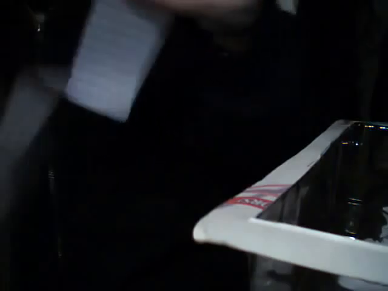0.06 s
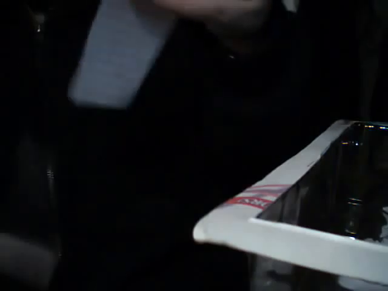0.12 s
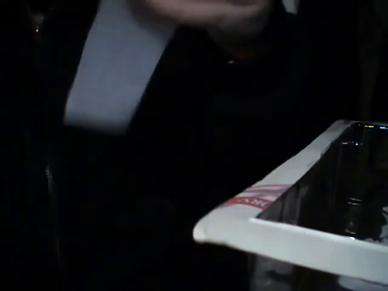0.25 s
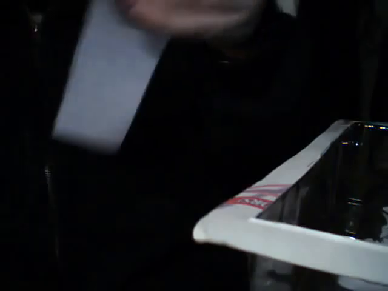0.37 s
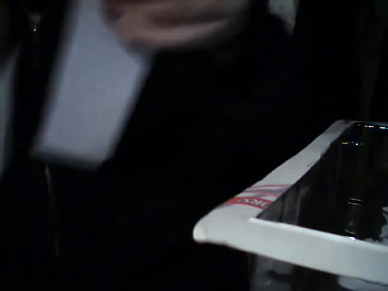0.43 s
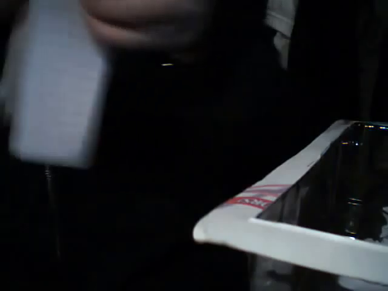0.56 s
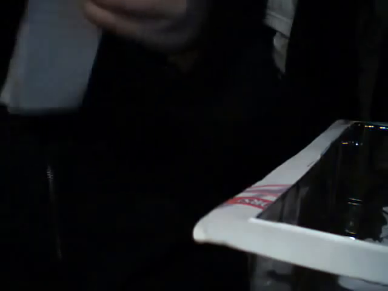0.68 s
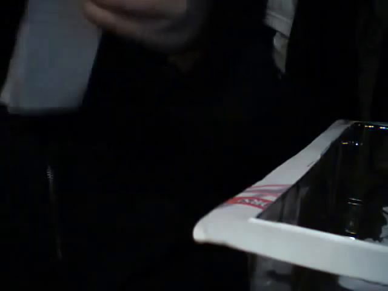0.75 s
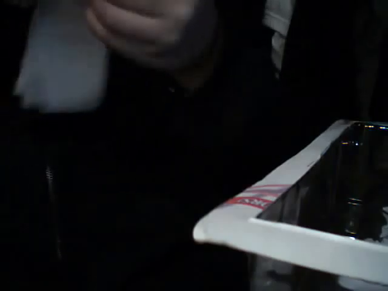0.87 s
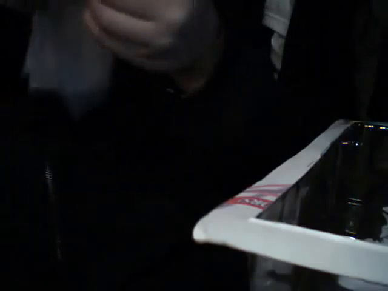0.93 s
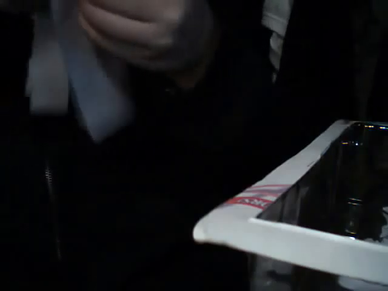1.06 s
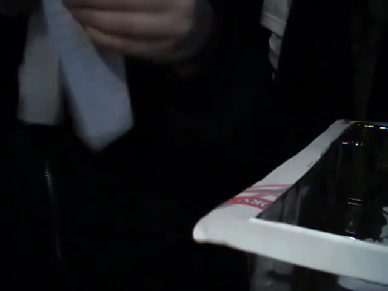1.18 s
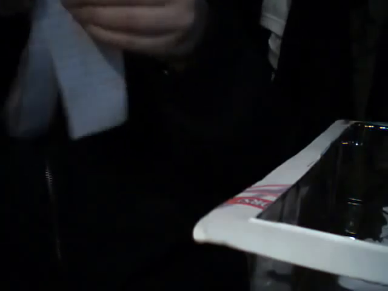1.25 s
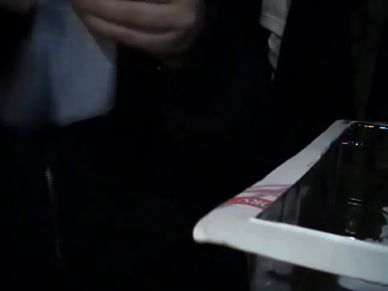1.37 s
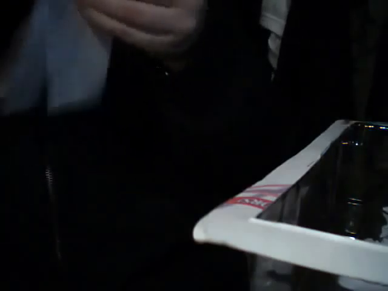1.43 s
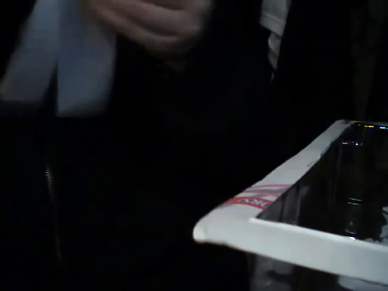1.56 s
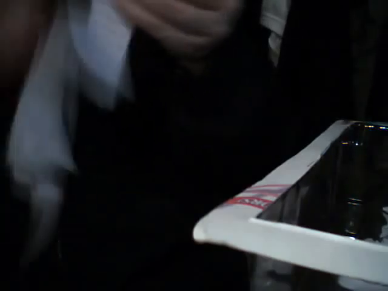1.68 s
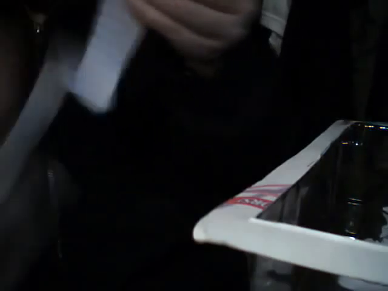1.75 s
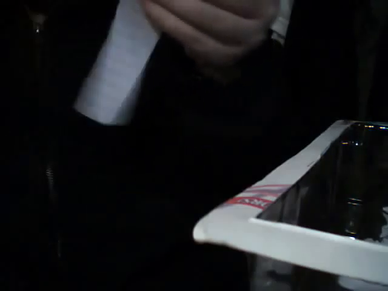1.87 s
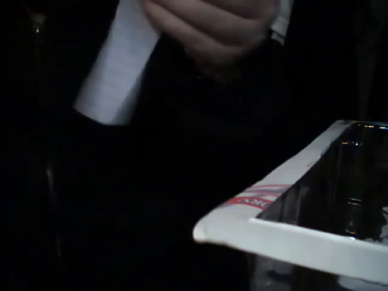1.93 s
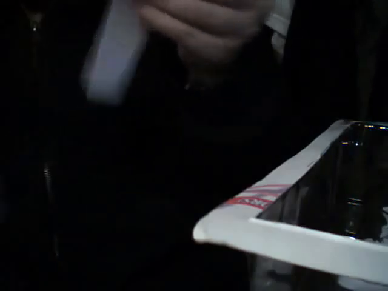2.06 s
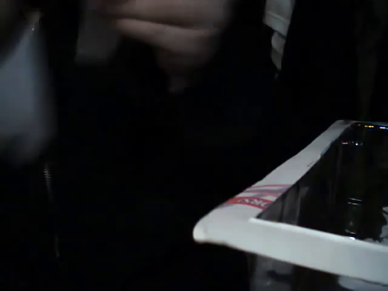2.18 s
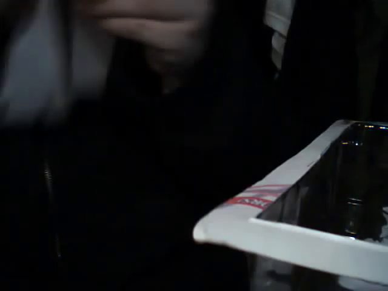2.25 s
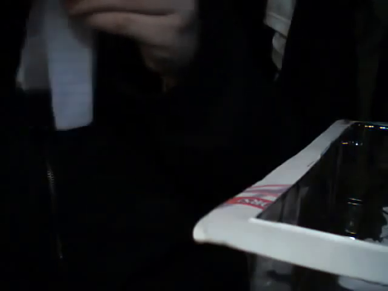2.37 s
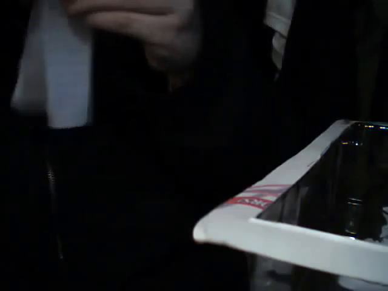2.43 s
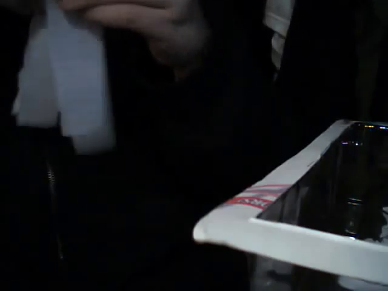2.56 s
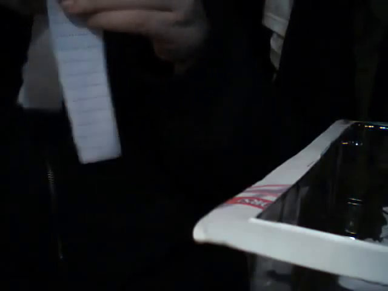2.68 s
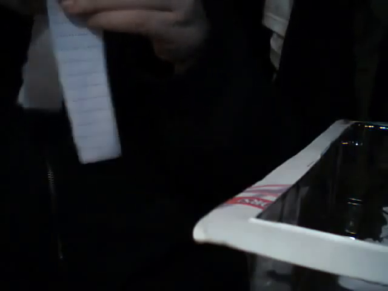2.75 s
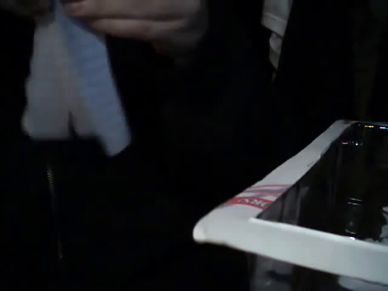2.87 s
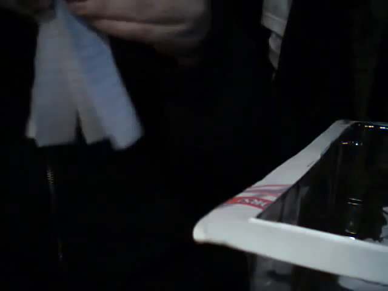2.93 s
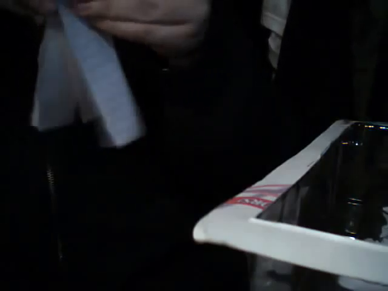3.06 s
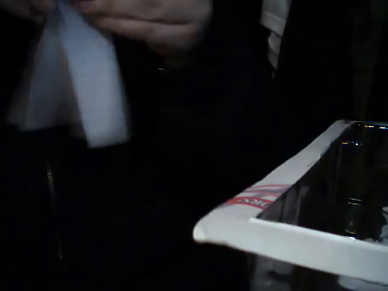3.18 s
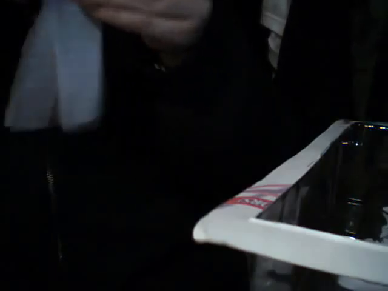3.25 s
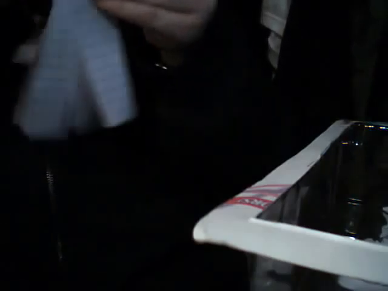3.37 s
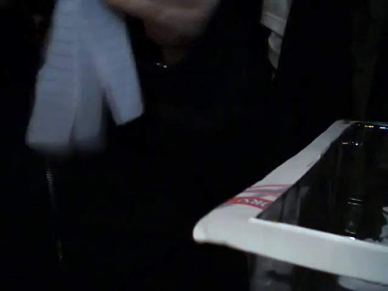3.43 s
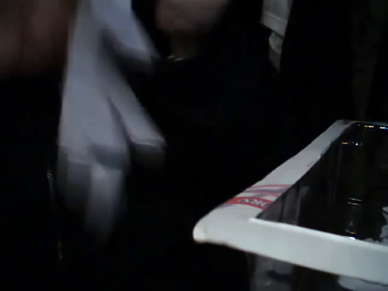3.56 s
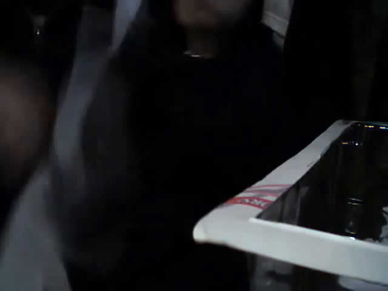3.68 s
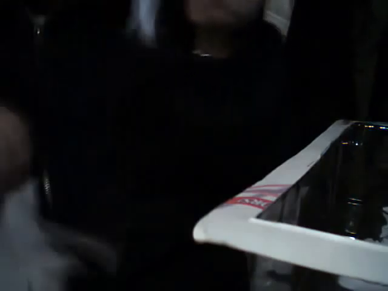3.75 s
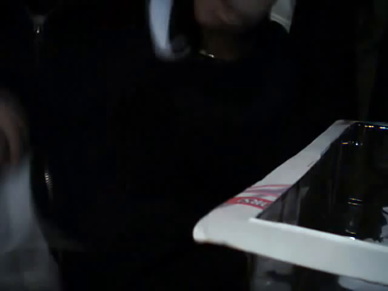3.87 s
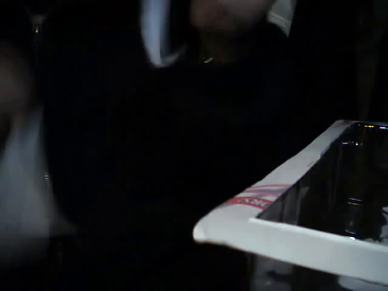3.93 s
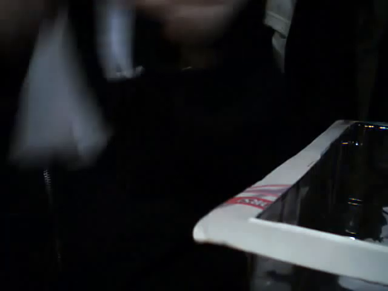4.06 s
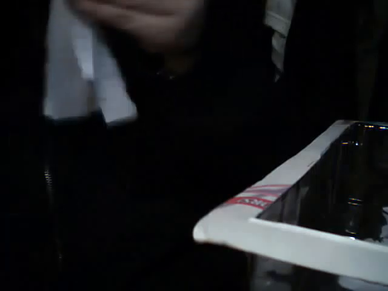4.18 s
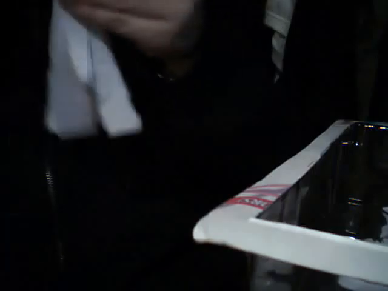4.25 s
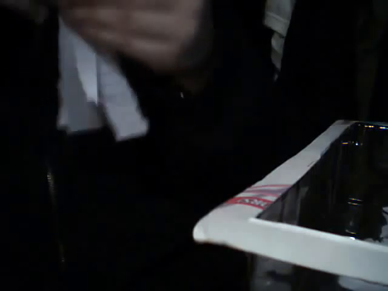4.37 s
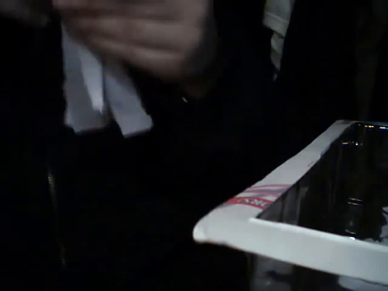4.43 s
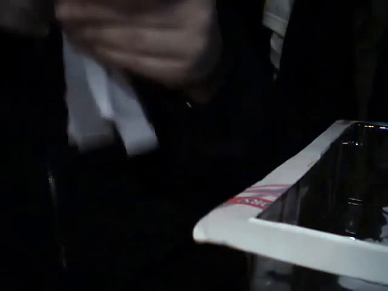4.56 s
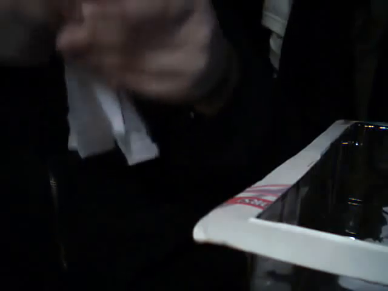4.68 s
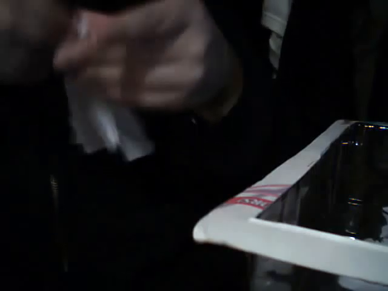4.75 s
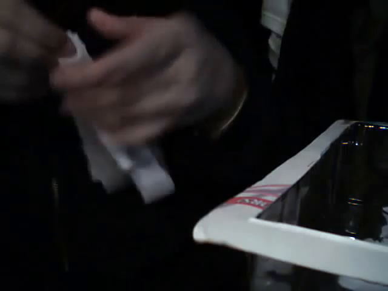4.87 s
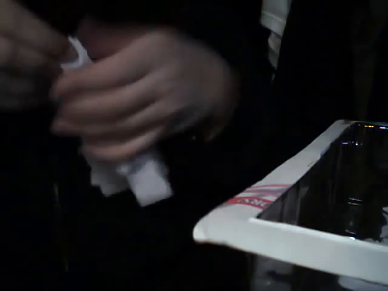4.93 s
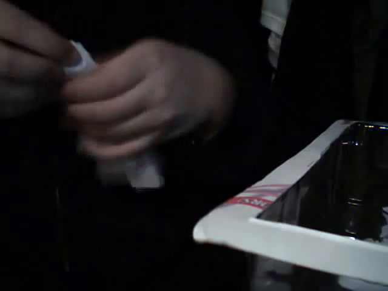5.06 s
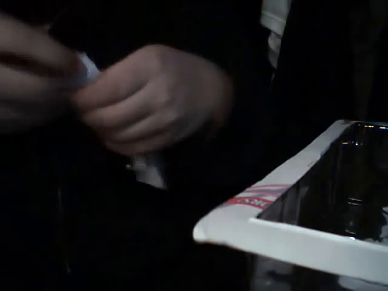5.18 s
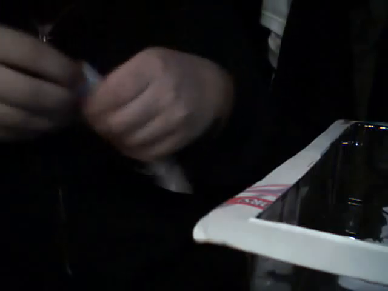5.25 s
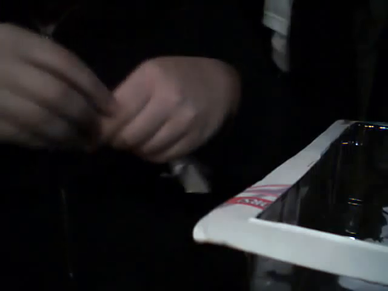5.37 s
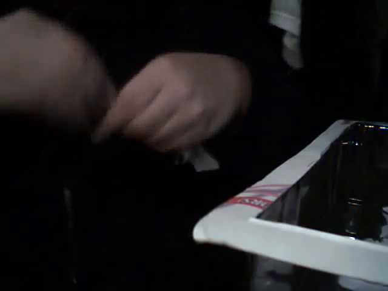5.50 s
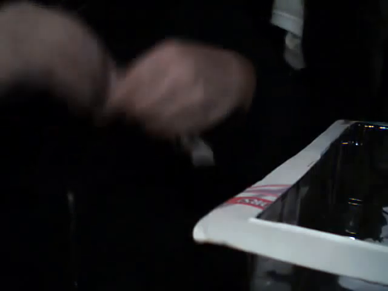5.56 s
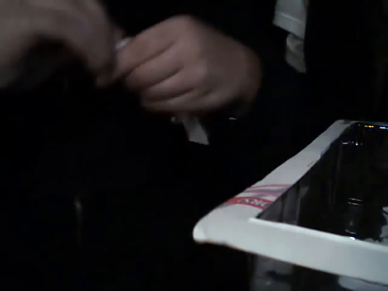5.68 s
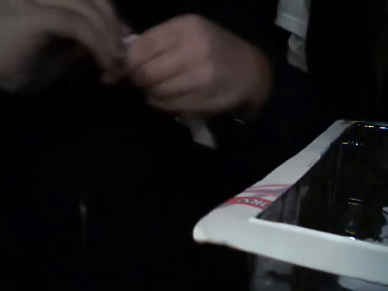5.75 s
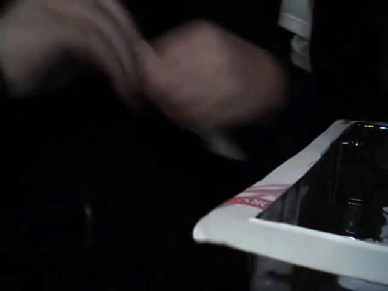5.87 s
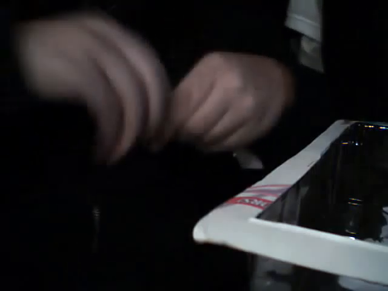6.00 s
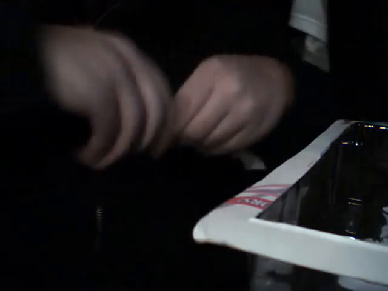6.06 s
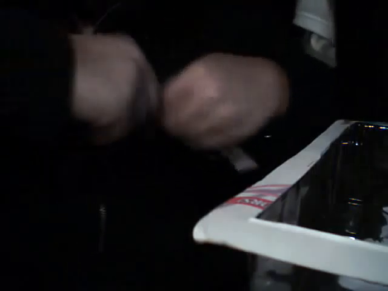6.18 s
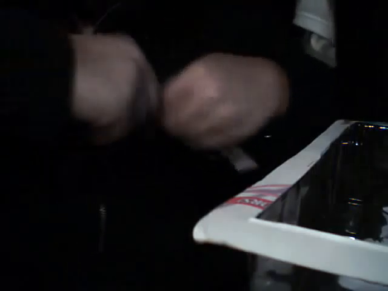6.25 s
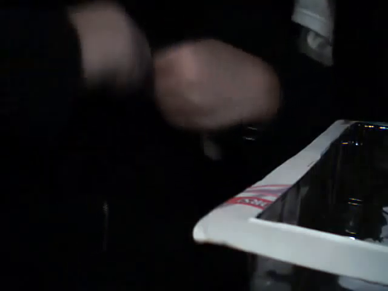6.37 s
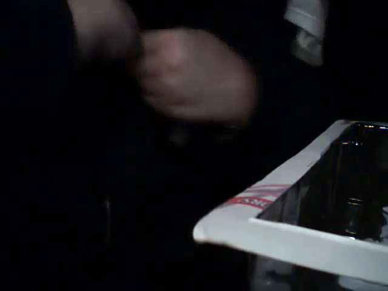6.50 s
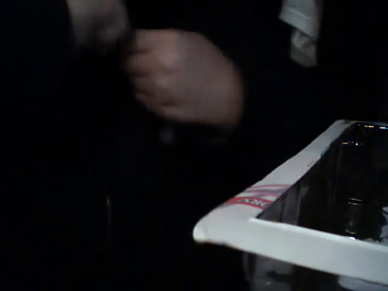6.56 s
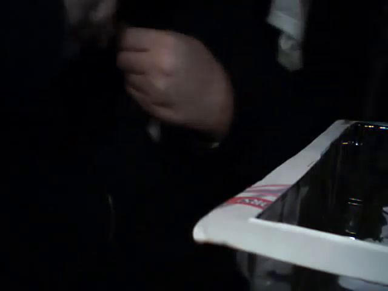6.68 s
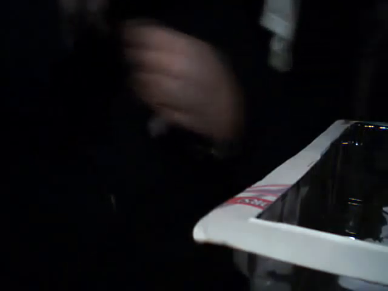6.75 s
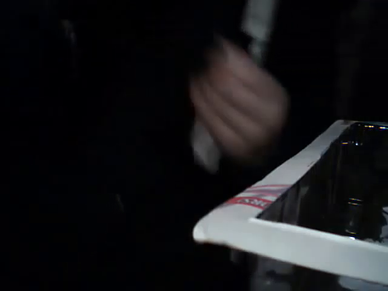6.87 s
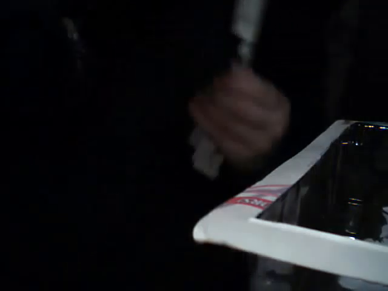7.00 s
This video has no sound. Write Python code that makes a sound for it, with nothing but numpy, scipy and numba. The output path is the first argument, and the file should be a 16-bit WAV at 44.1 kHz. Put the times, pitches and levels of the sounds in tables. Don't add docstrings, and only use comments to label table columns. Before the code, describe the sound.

Three quick close-up rips of paper, the first loudest, with faint finger rustles and creases between and after, over a soft steady fan whir.

```python
import sys
import numpy as np
from scipy import signal
from scipy.fft import rfft, irfft, dct
from scipy.io import wavfile
from scipy.ndimage import uniform_filter1d, minimum_filter1d
from numba import njit

SR = 44100
rng = np.random.default_rng(int(sys.argv[2]) if len(sys.argv) > 2 else 0)


def makeup_ratio(level_db):
    decades = np.asarray(level_db, float) / 20
    return 10 ** decades


def store_wav(level_fs):
    pcm = np.round(np.clip(np.atleast_2d(level_fs), -1, 1) * 32767)
    wavfile.write(sys.argv[1], SR, pcm.T.astype(np.int16))


N = 309582

# frequency in Hz, density in dB per Hz.
FAN_AIR = [(25, -13.5), (195, -13), (272, -9.5), (310, -18.5), (482, -8), (800, -9.5), (930, -19.5),
           (1050, -11.5), (1400, -6), (2000, -9), (2600, -14), (2800, -26), (3300, -43), (9000, -95.5)]
# frequency in Hz, density in dB per Hz.
FAN_HISS = [(1500, -40.5), (2700, -8.5), (3050, -4), (3400, -1), (4000, -4), (4600, -11), (5300, -7),
            (6000, -15.5), (7000, -13), (8000, -32)]
# frequency in Hz, rms level in dB.
FAN_WHINES = [(269.2, -73.5), (339.1, -80.5), (473.7, -71), (1087, -67.5), (1292, -58.5), (1631, -68.5),
              (2579, -74.5), (2719, -90)]
# frequency in Hz, density in dB per Hz.
PAPER_COLOUR = [(30, -14.5), (160, -13), (324, -13.5), (517, -6), (1170, -6), (1440, -5.5), (1960, -4),
                (3150, -10.5), (3600, -2), (4550, -6.5), (5150, -2.5), (5800, -2.5), (6500, -5.5),
                (7900, -13)]

# low edge in Hz, high edge in Hz, grains per second,
# cycles a grain, size scatter in dB, burst depth in dB, bursts per second.
SNAP = (4500, 7910, 6000, 5.2, 3.1, 1.6, 150)
BUZZ = (2600, 4500, 3000, 6.0, 2.6, 0.96, 120)
CRACKLE = (926, 2600, 1500, 6.16, 1.7, 3.0, 100)
FLAP = (300, 1000, 450, 5.5, 2.4, 1.1, 45)
PUSH = (19, 300, 460, 2.8, 0.88, 1.519, 30)
SLIDE = (2100, 8200, 5500, 12, 2, 4.6, 110)
# level in dB re the pull,
# share of the slack (ratio), power of the swing (exponent).
LAYER_ANSWERS = [
    (0.12, 0.017, 0.0088),
    (-1.5, 0.3085, 0.032),
    (-1.5, 1, .01),
    (-7, 0.697, .35),
]

# time in seconds, pull as level of the snapping fibres in dB,
# slack of the sheet in dB.
FIRST_RIP = [
    (0.0, -24, 3.5),
    (0.078, -18, -2.5),
    (0.084, -16, -2.5),
    (0.146, -22.5, -5),
    (0.15, -16.5, -10),
    (0.18, -18, -10.5),
    (0.198, -29, 2),
    (0.244, -38.5, -5),
    (0.268, -54.5, 0.5),
]
SECOND_RIP = [
    (1.6, -60.5, 8),
    (1.674, -25, -6.5),
    (1.736, -25.5, -3),
    (1.75, -23.5, -5.5),
    (1.786, -22.5, 0.5),
    (1.874, -23.5, -6.5),
    (1.906, -28, -8),
    (1.942, -52, -9.5),
    (1.95, -63, -5),
]
NICK = [
    (3.325, -62, 6),
    (3.339, -28.5, -19.5),
    (3.351, -42, -9),
    (3.359, -35, 1.5),
    (3.375, -54, -6),
    (3.406, -60, 3),
]
SLOW_START = [
    (3.49, -74, 0),
    (3.502, -50, -6),
    (3.52, -58, -10),
    (3.544, -39, -2),
    (3.608, -36, -9),
]
THIRD_RIP = [
    (3.608, -31, -12),
    (3.63, -23.5, -9.5),
    (3.668, -23, -17),
    (3.68, -27, -5.5),
    (3.722, -25, -8),
    (3.75, -32, -14),
    (3.76, -26, -12),
    (3.828, -60, -7),
    (3.835, -63, 11),
]
# loudest at in seconds, level in dB,
# rise in seconds, fall in seconds.
AIR = [
    (0.13, -33, 0.16, .12),
    (1.808, -38, .14, 0.11),
    (3.674, -42, 0.14, 0.037),
    (3.726, -42.5, 0.024, 0.036),
]
# time in seconds, peak in dB, pitch in Hz.
POPS = [(0.0473, -8.5, 2000), (0.0757, -8.5, 1990), (0.158, -16, 1390), (0.1955, -15.5, 1160),
        (1.652, -26, 1310), (1.713, -18.5, 1520), (1.755, -16.5, 510), (1.892, -20.5, 1150),
        (3.6203, -21, 1480), (3.6527, -21, 2100), (3.6772, -21, 2010), (3.7026, -18, 1980),
        (3.7625, -30, 1730), (3.7969, -37, 1700)]

# loudest at in seconds, level in dB, rise in seconds, fall in seconds.
RUSTLE = [(0.29, -63.5, 0.026, 0.082), (0.435, -71.5, .03, 0.22), (1.0, -72, .4, 0.19),
          (1.31, -66.5, 0.41, 0.087), (1.46, -72.5, .03, 0.22), (1.56, -58.5, 0.11, 0.17),
          (1.99, -64.5, 0.049, 0.14), (2.105, -66.5, 0.028, 0.24), (2.656, -70, 0.2, 0.063),
          (2.885, -68.5, .27, 0.16), (3.03, -60, 0.11, 0.094), (3.17, -66, 0.097, 0.12),
          (3.46, -56.5, .15, 0.15), (3.84, -64.5, .03, 0.14), (3.973, -66, 0.28, 0.15),
          (4.475, -73, .15, 0.072), (4.70, -79, .45, .1), (4.836, -67, 0.14, 0.23), (5.13, -65, .3, 0.1),
          (5.314, -66.5, 0.15, 0.21), (5.62, -71.5, .05, 1.7), (6.01, -68, .1, 0.4),
          (6.32, -73.5, .03, 0.33), (6.55, -63.5, 0.15, 0.12), (6.64, -67.5, .03, 0.24),
          (6.842, -48.5, .06, 0.022), (6.85, -58, 0.16, 0.12), (6.99, -76.5, 0.18, 0.11)]
# time in seconds, peak in dB, body of the sheet in dB re peak,
# body pitch in Hz, length in ms.
CREASES = [(1.1405, -37, 0.5, 1280, 8.9), (1.517, -41, -6, 1290, 7), (1.6511, -16.5, -1.5, 2240, 5),
           (3.183, -33, -2, 1450, 4.5), (3.204, -43, -10, 1280, 7.2), (3.3373, -18, -14, 2260, 6.9),
           (3.339, -24, -13, 2300, 8.3), (3.3566, -19.5, 7, 1950, 5.3), (3.5024, -45, -13, 2260, 5.9),
           (6.3981, -37, -12, 1260, 5.3), (6.8358, -29, -5, 2100, 11)]
# time in seconds, peak in dB, body of the sheet in dB re peak,
# body pitch in Hz, length in ms.
CRUMPLES = [
    (0.4886, -53, 3, 1290, 18),
    (2.8894, -57, 4, 1330, 16),
    (3.024, -53, -4, 1300, 21),
    (3.5516, -27.5, -1, 2250, 28),
    (3.567, -27, -7, 1320, 19),
    (4.472, -50, -11, 1280, 14),
    (4.7147, -33.5, 5, 1400, 18),
    (6.3736, -53, 8, 1200, 17),
    (6.55, -43, -0.5, 1270, 18),
    (6.8194, -42, -2, 1290, 17),
]
# time in seconds, peak in dB, pitch in Hz.
TAPS = [(0.997, -47.5, 390), (1.318, -45.5, 575), (1.354, -44.5, 560), (3.183, -37, 707), (3.357, -39, 597),
        (3.611, -26.5, 534), (3.641, -26.5, 570), (4.713, -45, 800), (5.77, -51, 540), (6.355, -41.5, 600),
        (6.552, -44, 600), (6.834, -47, 559)]
# mirror in Hz, low edge in Hz, high edge in Hz, level in dB.
IMAGES = [(22530, 14500, 15900, -37.5), (14720, 8900, 9700, -38)]


def level(x, db):
    return x * makeup_ratio(db) / np.sqrt(np.mean(x ** 2))


def colour(x, points):
    hz, db = np.transpose(points)
    bins = np.maximum(np.arange(2049) * SR / 4096, 1)
    log_gain = np.interp(np.log(bins), np.log(hz), db) * np.log(10) / 20
    cepstrum = irfft(log_gain)
    cepstrum[1:2048] *= 2
    cepstrum[2049:] = 0
    return signal.fftconvolve(x, irfft(np.exp(rfft(cepstrum))))[:N]


def band(x, lo_hz, hi_hz):
    return signal.sosfilt(signal.butter(3, [lo_hz, hi_hz], "band", fs=SR, output="sos"), x)


def walk(rate):
    hold = int(SR / rate)
    steps = rng.standard_normal(N // hold + 1)
    return 0.77 * uniform_filter1d(np.repeat(steps, hold), hold)[:N]


def swells(rows, bend):
    t = np.arange(0, N, 32)[:, None] / SR
    s, db, rise, fall = np.transpose(rows)
    away = np.where(t < s, (s - t) / np.abs(rise), (t - s) / np.abs(fall))
    drop_db = 21.5 * np.minimum(away, 9) ** bend
    power = np.sum(makeup_ratio(db - drop_db) ** 2, axis=1)
    return np.interp(np.arange(N) / SR, t[:, 0], np.sqrt(power))


@njit
def ring(s, hz, cycles, size):
    y = np.zeros(N)
    for k in range(len(s)):
        turn = np.exp((2j * np.pi - 2.3 / cycles[k]) * hz[k] / SR)
        z, start = size[k] + 0j, int(s[k] * SR)
        for i in range(start, min(start + int(3 * cycles[k] * SR / hz[k]), N)):
            y[i] += z.imag
            z *= turn
    return y


def grains(lo_hz, hi_hz, rate, cycles, scatter_db, burst_db, bursts):
    when, pitch, size, sign = rng.random((int(rate * N / SR), 4)).T
    hz = lo_hz + (hi_hz - lo_hz) * pitch
    scatter = makeup_ratio(scatter_db * np.minimum(-np.log(1 - size), 4))
    size = scatter * np.sqrt(hz) * np.sign(sign - 0.5)
    raw = ring(when * N / SR, hz, np.full(len(hz), 1.0 * cycles), size)
    bursting = raw * makeup_ratio(burst_db * walk(bursts))
    sound = level(band(colour(bursting, PAPER_COLOUR), lo_hz, hi_hz), 0)
    spent = uniform_filter1d(uniform_filter1d(sound ** 2, size=1200), size=1200)
    return level(sound / (spent + 0.05) ** 0.35, 0)


def fan():
    air = level(colour(rng.standard_normal(N), FAN_AIR), -54.5) * makeup_ratio(0.46 * walk(4.3))
    hiss = level(colour(rng.standard_normal(N), FAN_HISS), -70.5)
    drift = 1 + 0.003 * walk(1.1)
    whine = 0
    for hz, db in FAN_WHINES:
        phase = 2 * np.pi * np.cumsum(hz * (drift + 0.003 * walk(30))) / SR
        whine = whine + np.sqrt(2) * makeup_ratio(db + 2.0 * walk(15)) * np.sin(phase)
    return air + hiss + whine


def air_gain():
    return swells(AIR, 1.8)


def pulled(db_re, share):
    t, db = np.arange(N) / SR, np.full(N, -120.0)
    for rip in (FIRST_RIP, SECOND_RIP, NICK, SLOW_START, THIRD_RIP):
        s, pull_db, slack_db = np.transpose(rip)
        inside = (t >= s[0]) & (t <= s[-1])
        db[inside] = np.interp(t[inside], s, pull_db + db_re + share * slack_db)
    return makeup_ratio(uniform_filter1d(db, size=64))


def tears():
    no_swing_db, full_swing_db = -65, -33.5
    swing = (air_gain() + makeup_ratio(no_swing_db)) / makeup_ratio(full_swing_db)
    total = np.zeros(N)
    for layer, (db, slack, swung) in zip((SNAP, BUZZ, CRACKLE, FLAP), LAYER_ANSWERS):
        total += grains(*layer) * pulled(db, slack) * swing ** swung
    return total


def pushed_air():
    return grains(*PUSH) * air_gain()


def pops():
    s, db, hz = np.transpose(POPS)
    return band(ring(s, hz, np.full(len(s), 10.0), makeup_ratio(db - 1.5)), 300, 3800)


def rustle():
    return grains(*SLIDE) * swells(RUSTLE, 1.1)


def creases():
    s, db, body_db, body_hz, ms = np.vstack([CREASES, CRUMPLES]).T
    late, pitch, sign = rng.random((3, len(s), 60))
    size = makeup_ratio(db[:, None] - 2 - 23 * late) * np.sign(sign - 0.5)
    when = s[:, None] + ms[:, None] / 1000 * late ** 1.15
    hz = 2600 + 4800 * pitch
    clicks = ring(when.ravel(), hz.ravel(), np.full(late.size, 4.0), size.ravel())
    body = ring(s + 0.00062, body_hz, np.full(len(s), 6.0), makeup_ratio(db + body_db - 3.0))
    return band(colour(clicks, PAPER_COLOUR) + body, 930, 11000)


def taps():
    s, db, hz = np.transpose(TAPS)
    return band(ring(s, hz, np.full(len(s), 4.0), makeup_ratio(db + 4.5)), 260, 2300)


def room_echo(x):
    t60_s, echo_db = 0.054, -11.5
    t = np.arange(SR // 3) / SR
    echo = rng.standard_normal(len(t)) * makeup_ratio(-60 * t / t60_s) * (t > 0.003)
    echo *= makeup_ratio(echo_db) / np.sqrt(np.sum(echo ** 2))
    return signal.fftconvolve(x, echo)[:N]


def scene():
    whir = fan()
    paper = tears() + pushed_air() + pops() + rustle() + creases() + taps()
    return (paper + room_echo(paper) + whir)[None]


def coarse_frames(x, size, below_db, slope_db, patchy_db):
    count, half, bands, quiet_db = N // size + 2, size // 2, 128, -53
    window = np.sin(np.pi * (np.arange(2 * size) + 0.5) / (2 * size))
    padded = np.pad(x, (size, count * size - N))
    frames = np.array([padded[k * size:(k + 2) * size] * window for k in range(count)])
    a, b, c, d = np.split(frames, 4, axis=1)
    lines = dct(np.hstack([-c[:, ::-1] - d, a - b[:, ::-1]]), type=4, norm="ortho")
    loud = np.sqrt(np.mean(lines ** 2, axis=1, keepdims=True))
    wander = np.repeat(rng.standard_normal((count, bands)), size // bands, axis=1)
    khz = np.arange(size) * SR / (2000 * size)
    step = np.maximum(makeup_ratio(quiet_db), loud * makeup_ratio(below_db)) * makeup_ratio(patchy_db * wander + slope_db * khz)
    u = dct(np.round(lines / step) * step, type=4, norm="ortho")
    frames = np.hstack([u[:, half:], -u[:, :half - 1:-1], -u[:, half - 1::-1], -u[:, :half]]) * window
    out = np.zeros(len(padded))
    out[:count * size] += frames[:, :size].ravel()
    out[size:] += frames[:, size:].ravel()
    return out[size:size + N]


def thinned_treble(x):
    long, short = 4096, 512
    treble = uniform_filter1d(band(x, 2200, 8800) ** 2, size=short)
    near = -minimum_filter1d(-1.0 * (treble > makeup_ratio(-56.5) ** 2), size=2 * short)
    share = uniform_filter1d(near, size=short)
    steady = coarse_frames((1 - share) * x, long, below_db=-20, slope_db=0.64, patchy_db=4.5)
    busy = coarse_frames(share * x, short, below_db=-17, slope_db=-0.8, patchy_db=4)
    return signal.sosfilt(signal.ellip(10, 0.3, 90, 8047, fs=SR, output="sos"), busy + steady)


def mirror_images(x):
    total = np.zeros(N)
    for mirror_hz, lo_hz, hi_hz, db in IMAGES:
        mirrored = x * np.cos(2 * np.pi * mirror_hz * np.arange(N) / SR)
        total += makeup_ratio(db) * band(band(mirrored, lo_hz, hi_hz), lo_hz, hi_hz)
    return total


def band_limit(x):
    return signal.sosfilt(signal.butter(12, 16400, fs=SR, output="sos"), x)


def record(dry):
    heard = thinned_treble(dry[0])
    last_bit = makeup_ratio(-91) * rng.standard_normal(N)
    mix = heard + last_bit + mirror_images(heard)
    return band_limit(mix[None])


dry = scene()
out = record(dry)
store_wav(out)
```